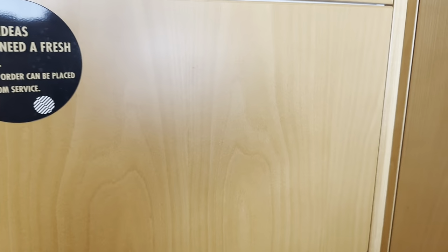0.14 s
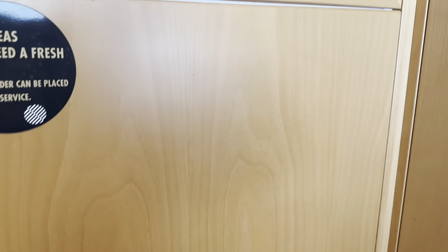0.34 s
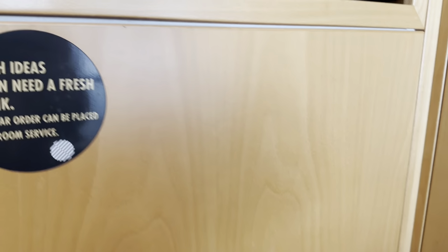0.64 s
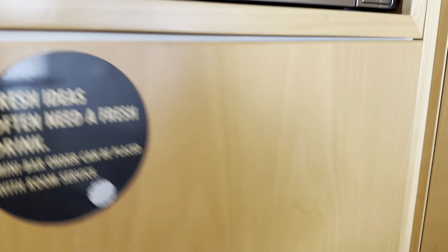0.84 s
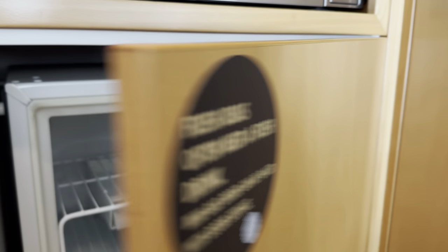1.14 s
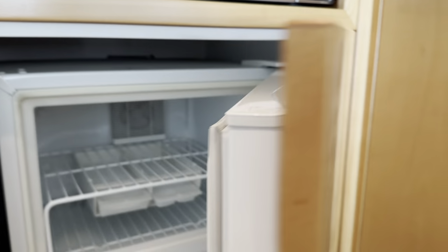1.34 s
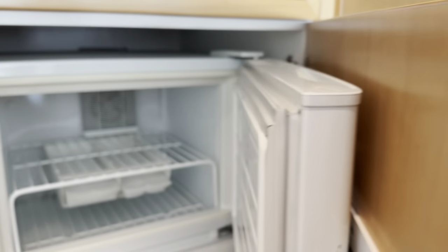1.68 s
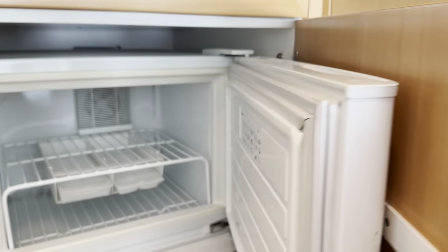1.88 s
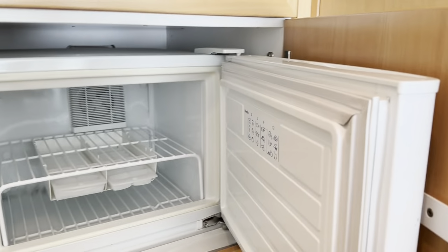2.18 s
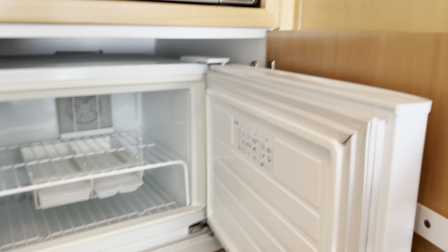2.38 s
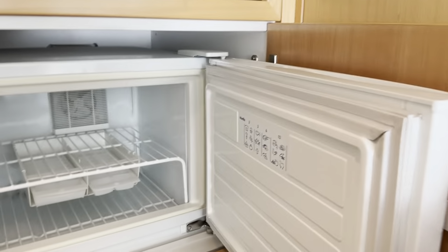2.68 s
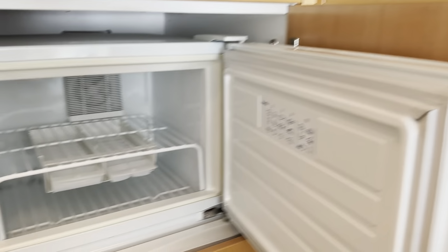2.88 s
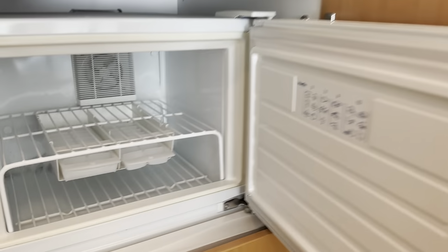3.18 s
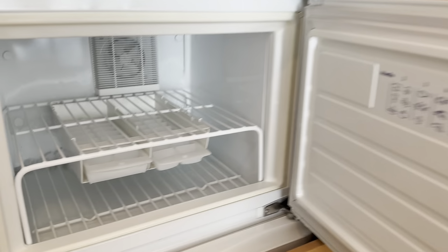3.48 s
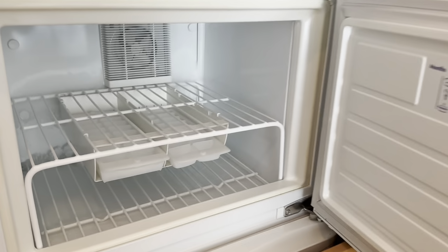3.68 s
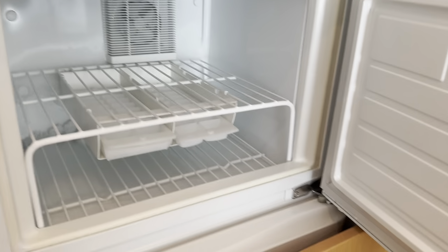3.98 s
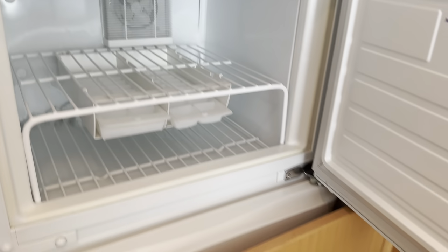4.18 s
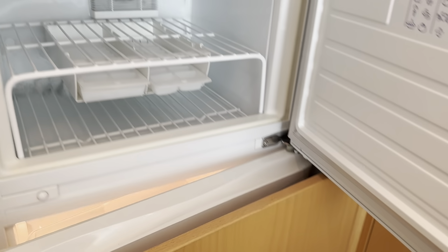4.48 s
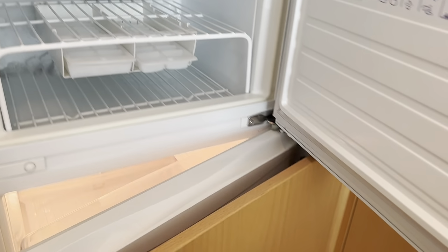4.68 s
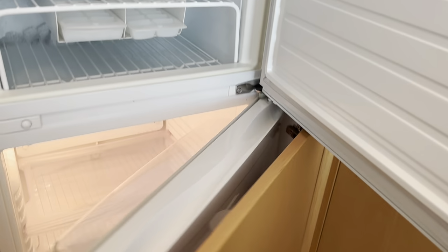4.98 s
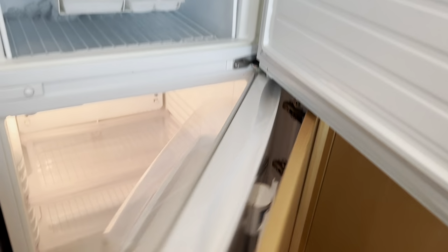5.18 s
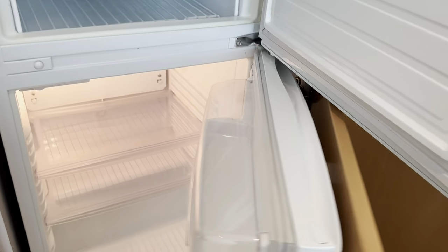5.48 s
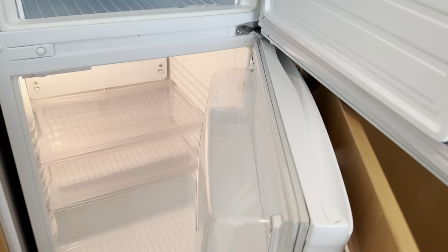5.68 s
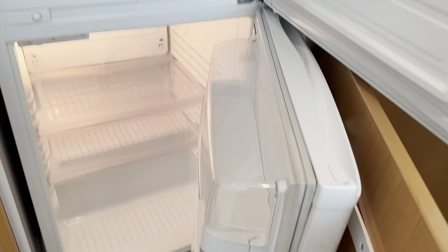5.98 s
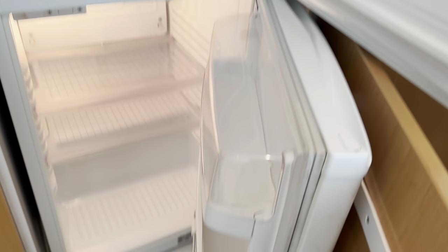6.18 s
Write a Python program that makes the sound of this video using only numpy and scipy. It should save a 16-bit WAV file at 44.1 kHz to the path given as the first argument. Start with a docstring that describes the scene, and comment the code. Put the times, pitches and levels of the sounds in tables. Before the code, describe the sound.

Loud, sharp wooden hinge cracks quicken and fade as a cabinet opens, then fridge doors knock, thump and peel their rubber seals over a low hum.

```python
"""Sharp cracks that quicken and weaken: a wooden cabinet door is pulled open on a stiff hinge, by stick-slip.
Each slip is a burst of noise that sets off decaying modes of hinge arm and panel, then a cavity boom.
Doors of the small fridge behind it knock (noise and modes), and a rubber seal crackles and peels in noise pops.
Pushed air rings the fridge low, rubbing is shaped noise, and a small quiet room adds a drone and hum tones.
Two close microphones hear it all."""
import sys
import numpy as np
from scipy import signal
from scipy.fft import rfft, irfft, next_fast_len
from scipy.io import wavfile
from scipy.ndimage import map_coordinates

SR = 44100
rng = np.random.default_rng(int(sys.argv[2]) if len(sys.argv) > 2 else 0)


def store_pcm(level_fs):
    """Save levels as 16-bit WAV."""
    pcm = np.round(np.clip(level_fs, -1, 1) * 32767).astype(np.int16)
    wavfile.write(sys.argv[1], SR, np.atleast_2d(pcm).T)


N = 279594
T = np.arange(int(.8 * SR)) / SR  # time within one struck sound, s
TOP_HZ = 15950  # upper band limit


def amp(db):
    """Logarithmic level: decibels to amplitude gain."""
    return 10 ** (np.asarray(db) / 20)


def unit(x):
    """Power normalisation: scale a (mid, side) pair so that mid has rms 1."""
    return x / np.sqrt(np.mean(x[0] ** 2) + 1e-20)


def struck(x):
    """Onset normalisation: scale a (mid, side) pair so that the first 30 ms of mid have rms 1."""
    onset = x[0, :int(.03 * SR)]
    return x / np.sqrt(np.mean(onset ** 2) + 1e-20)


def along(points, hz):
    """Logarithmic frequency scale: interpolate (f/Hz, value) points on a log axis."""
    f, v = np.transpose(points)
    return np.interp(np.log(hz + 1), np.log(f + 1), v)


def wobble(rate):
    """Band-limited fluctuation: a smooth random curve with rate knots a second."""
    knots = rng.standard_normal(int(N * rate / SR) + 4)
    return map_coordinates(knots, [np.arange(N) * rate / SR])


def filtered(x, response):
    """Linear filtering: multiply the spectrum of x by a complex response of frequency."""
    n = x.shape[-1]
    m = next_fast_len(n + 8192, True)
    return irfft(rfft(x, m) * response(np.fft.rfftfreq(m, 1 / SR)), m)[..., :n]


def coloured(x, spectrum):
    """Minimum phase: a causal filter derived from (f/Hz, level/dB) by folding its cepstrum."""
    def response(hz):
        cep = irfft(np.log(amp(along(spectrum, hz))))
        half = len(cep) // 2
        return np.exp(rfft(np.r_[cep[0], 2 * cep[1:half], np.zeros(half)]))
    return filtered(x, response)


def noise(spectrum, size):
    """Spectral shaping: a (mid, side) pair of independent coloured noises, mid at rms 1."""
    white = rng.standard_normal((2, size))
    return unit(filtered(white, lambda hz: amp(along(spectrum, hz))))


def dying(t60s):
    """Modal overlap: noise stands for countless modes, each frequency decaying at its own rate."""
    hz, t, z = signal.stft(rng.standard_normal((2, len(T))), SR, nperseg=256)
    decay = amp(-60 * t / along(t60s, hz)[:, None])
    return signal.istft(z * decay, SR, nperseg=256)[1][:, :len(T)]


def bent(x, lag):
    """Bending-wave dispersion: low frequencies arrive later (lag in s at 1 kHz)."""
    return filtered(x, lambda hz: np.exp(-4j * np.pi * lag * np.sqrt(1000 * hz)))


def ring(modes, attack, scatter_db):
    """Modal superposition: damped sines, with new strengths for each blow."""
    waves = 0
    for hz, db, t60 in modes:
        strength_db = db + rng.normal(0, scatter_db, (2, 1))
        phase = np.array([[0], [rng.uniform(0, 2 * np.pi)]])  # mid, side
        waves = waves + amp(strength_db - 60 * T / t60) * np.sin(2 * np.pi * hz * T + phase)
    return struck(waves * (1 - np.exp(-T / attack)))


def add(track, s, sound):
    """Linear superposition: mix a sound into the track at time s."""
    part = track[:, max(round(s * SR), 0):][:, :sound.shape[1]]
    part += sound[:, :part.shape[1]]


def boxed(x, span, echo_db, count=10):
    """Comb interference: close echoes between the walls colour a sound with fine peaks."""
    out = x.copy()
    gains = rng.choice([-1, 1], count) * amp(echo_db)
    for delay, gain in zip(rng.uniform(.002, span, count), gains):
        add(out, delay, gain * x)
    return out


# Room reverberation: columns f/Hz, decay time t60/s
ROOM_DECAY = [(100, 0.56), (500, 0.59), (2000, 0.442), (8000, 0.263), (15000, .22)]


def burst(spectrum, t60, tail_db):
    """Impact on a damped part: a brief noise, its close echoes and the room's reverberation."""
    blow = rng.standard_normal((2, len(T))) * amp(-60 * T / t60)
    direct = boxed(blow, span=.013, echo_db=-10.5)
    return struck(coloured(direct + amp(tail_db) * dying(ROOM_DECAY), spectrum))


def gesture(start, hold, attack, change_db, t60):
    """Envelope of one movement: rises until start, changes by change_db over the hold, then decays."""
    t = np.arange(N) / SR - start
    rise = np.exp(-(np.minimum(t, 0) / attack * 2) ** 2)
    return rise * amp(change_db * np.clip(t / hold, 0, 1) - 60 * np.maximum(t - hold, 0) / t60)


# Room drone spectrum: columns f/Hz, level/dB (relative)
DRONE_SPECTRUM = [(22, -18.5), (44, 4.5), (80, -5.5), (109, -2), (150, -12), (242, -18.5), (330, -25.5),
                  (600, -34), (1230, -45.5), (2400, -46.5), (3100, -56), (6100, -61.5), (11000, -59.5),
                  (16000, -67)]
# Hum tones: columns f/Hz, level/dB (peak, before wavering)
HUM_TONES = [(43, -58.5), (113, -54.5), (237, -61)]
# the low drone grows slowly from one level to a higher one
EARLY_DRONE_DB, LATE_DRONE_DB = -49.5, -45.5
DRONE_RISE_START_S, DRONE_RISE_END_S = 1.8, 3.6


def background():
    """Stationary noise and modulated tones: a low drone, which grows once, and a wavering hum."""
    t = np.arange(N) / SR
    drone_db = np.interp(t, [DRONE_RISE_START_S, DRONE_RISE_END_S], [EARLY_DRONE_DB, LATE_DRONE_DB])
    hum = np.zeros(N)
    for hz, db in HUM_TONES:
        strength = amp(db + 1.5 * wobble(7))
        hum += strength * np.sin(2 * np.pi * hz * t + 1.3 * wobble(14))
    drone = amp(drone_db) * noise(DRONE_SPECTRUM, N)
    return drone + hum * np.array([[1], [0]])  # hum in mid only


# Pulls and pushes that make a door rub: columns start t/s, hold t/s, scrape level/dB, hiss level/dB
RUB_STROKES = [(0, 0.3, -30.5, -47), (0.54, 0.16, -33.5, -50), (1.064, 0.17, -43, -77),
               (1.44, 1.68, -66.5, -75), (3.481, 0.064, -70.5, -68.5), (3.978, 0.7, -54, -71),
               (4.937, 0.22, -65.5, -74.5)]
# Free swings of a door: columns start t/s, hold t/s, level/dB
FREE_SWINGS = [(1.099, 0.37, -70), (2.378, 0.097, -80)]
# Spectra of scraping wood, rubbing fittings and the thin hiss of a swing: columns f/Hz, level/dB (relative)
SCRAPE_SPECTRUM = [(40, -27), (70, 7), (200, 0.5), (420, -3.5), (700, -8), (1500, -12.5), (3000, -23),
                   (7000, -52)]
HISS_SPECTRUM = [(1000, -12), (2500, 0), (5000, 0), (6700, -1), (8200, -7), (11000, -5), (14500, -17),
                 (17000, -35)]
SWING_SPECTRUM = [(4500, -27), (5900, -6), (6600, -1.5), (7300, -2.5), (8200, -17.5)]
# a stroke rises, eases off while it lasts, and dies away
STROKE_ATTACK_S, STROKE_SAG_DB, STROKE_T60_S = 0.069, 5, 0.74
SWING_ATTACK_S, SWING_T60_S = .2, 1.2
SCRAPE_ROUGH_DB, SCRAPE_CATCHES_PER_S = 2.5, 45


def rubbing():
    """Sliding friction: wood and fittings rub unevenly; a freely swinging door hisses thinly."""
    scrape, hiss, swish = np.zeros((3, N))
    for s, hold, scrape_db, hiss_db in RUB_STROKES:
        stroke = gesture(s, hold, STROKE_ATTACK_S, -STROKE_SAG_DB, STROKE_T60_S)
        scrape += amp(scrape_db) * stroke
        hiss += amp(hiss_db) * stroke
    for s, hold, db in FREE_SWINGS:
        swish += amp(db) * gesture(s, hold, SWING_ATTACK_S, 0, SWING_T60_S)
    scrape *= amp(SCRAPE_ROUGH_DB * wobble(SCRAPE_CATCHES_PER_S))
    hiss *= amp(1.2 * wobble(4.6))
    swish *= amp(1.3 * wobble(2.7))
    out = scrape * noise(SCRAPE_SPECTRUM, N)
    out += hiss * noise(HISS_SPECTRUM, N)
    return out + swish * noise(SWING_SPECTRUM, N)


# Air pushed by a fridge door: columns t/s, level/dB
AIR_PUSHES = [(2.6, -40), (3.787, -23), (4.019, -39.5), (4.411, -28.5)]
# Low modes of the fridge's box: columns f/Hz, level/dB (relative), t60/s
FRIDGE_BOX = [(68, 6.5, 0.23), (115.3, -0.5, 0.38), (234.7, -2, 0.3), (385.5, -15.5, 0.22)]
BASS_SCATTER_DB = 1  # also used by the cabinet boom


def thumps():
    """Resonance excited by pressure: the fridge's box rings low when a door pushes or pulls its air."""
    out = np.zeros((2, N))
    for s, db in AIR_PUSHES:
        add(out, s, amp(db) * ring(FRIDGE_BOX, attack=0.0095, scatter_db=BASS_SCATTER_DB))
    return out


# Door knocks: columns t/s, skin level/dB, hollow body level/dB, edge level/dB (before each part's trim); the
# first row adds a knock-like body to the last hinge slip, the others are fridge doors bumping
DOOR_KNOCKS = [(1.281, -34, -36.5, -63), (1.791, -44, -50.5, -60.5), (1.863, -45, -77, -62),
               (2.568, -38, -46, -61), (2.583, -40.5, -41, -45.5), (3.062, -59.5, -61, -80),
               (3.714, -51.5, -44.5, -76), (3.77, -11, -28.5, -35.5), (3.932, -39, -41, -69),
               (4.024, -32.5, -34, -35), (4.932, -50.5, -63, -64), (5.022, -56, -58, -69.5),
               (5.349, -43, -35.5, -40.5), (5.477, -37, -39.5, -57)]
# Spectra of the plastic skin, the door cavity and the hard edge: columns f/Hz, level/dB (relative)
SKIN_SPECTRUM = [(250, -23.5), (450, -7.5), (700, -10), (1000, -8), (1150, -3), (1380, -3.5), (1700, -13),
                 (1950, -10), (2500, -17), (3200, -29), (6000, -36.5), (9000, -59)]
HOLLOW_SPECTRUM = [(120, -18), (240, 2), (310, -2), (450, -3), (700, -9.5), (900, -11.5), (2000, -43.5)]
EDGE_SPECTRUM = [(1200, -12), (2100, -3.5), (3100, 0), (3900, 0.5), (4800, -7.5), (7000, -3.5),
                 (8100, -6.5), (9500, -21.5), (14000, -17)]
# Modes of the plastic skin and the hollow fridge door: columns f/Hz, level/dB (relative), t60/s
SKIN_RING = [(443, -14, 0.1), (765, -15.5, 0.17), (980.5, -2, 0.085), (1417, -11.5, 0.21),
             (1908, -8, 0.098)]
HOLLOW_RING = [(221.8, -12, 0.466), (278.5, 8, 0.22), (394, 3.5, 0.28), (552, -8.5, 0.35), (706, 3, 0.25)]


def knocks():
    """Impact excitation: doors bump with a hard edge, a plastic skin and the hollow behind it."""
    out = np.zeros((2, N))
    for s, skin_db, body_db, edge_db in DOOR_KNOCKS:
        add(out, s, amp(skin_db - 11.5) * burst(SKIN_SPECTRUM, t60=.06, tail_db=-18))
        add(out, s, amp(skin_db - 17.0) * ring(SKIN_RING, attack=0.00053, scatter_db=2.5))
        # the hollow answers just after the skin
        add(out, s + 0.0027, amp(body_db - 3.5) * burst(HOLLOW_SPECTRUM, t60=0.17, tail_db=-5.5))
        add(out, s + 0.00274, amp(body_db - 9.5) * ring(HOLLOW_RING, attack=0.016, scatter_db=6.5))
        add(out, s, amp(edge_db - 10.5) * burst(EDGE_SPECTRUM, t60=.06, tail_db=-4.5))
    return out


PEEL_START_S, PEEL_HOLD_S, PEEL_DB = 4.335, .062, -43.5  # the seal peels off
STRETCH_S, STRETCH_DB, STRETCH_SCATTER_DB = 0.22, -47.5, 0.5  # the stretch just before it peels


def stretching(count=6):
    """Stick-slip under tension: faint ticks at uneven gaps as the seal stretches, as (t/s, level/dB)."""
    slots = (np.arange(count) + rng.uniform(size=count)) / count
    return list(zip(PEEL_START_S - STRETCH_S * slots, rng.normal(STRETCH_DB, STRETCH_SCATTER_DB, count)))


# Sticky ticks of rubber and plastic: columns t/s, level/dB (before a common trim)
STICKY_TICKS = [(2.583, -40.5), (3.7609, -31), (3.776, -41.5), (3.926, -34), (3.978, -37.5), (4.021, -20),
                (4.031, -26), (4.1729, -39), (4.208, -38.5), (4.394, -27), (4.95, -52), (5.088, -51),
                (5.348, -29.5)]
# Spectra of rubber letting go and of air in the door gap: columns f/Hz, level/dB (relative)
RUBBER_SPECTRUM = [(300, -17), (800, -3.5), (1200, -8), (2500, -0.5), (3600, -9), (4400, -2.5), (5300, -6),
                   (8000, -4), (11200, -4.5), (13500, -12.5), (16000, -15)]
GAP_AIR_SPECTRUM = [(35, -37.5), (70, -3), (150, 2.5), (300, -2.5), (440, -4), (600, -7.5), (1000, -13),
                    (1600, -23), (4000, -41)]
PEEL_ATTACK_S, PEEL_SWELL_DB_PER_S, PEEL_T60_S = 0.012, 92, 0.083
GULP_DELAY_S, GULP_DB = 0.028, -29.5  # air rushes in once the peel has begun


def seal():
    """Adhesive release: rubber lets go in sticky ticks, then peels off in one rush of tiny pops."""
    out = np.zeros((2, N))
    for s, db in STICKY_TICKS + stretching():
        add(out, s, amp(db - 18.5) * burst(RUBBER_SPECTRUM, t60=0.028, tail_db=-13))
    swell_db = PEEL_SWELL_DB_PER_S * PEEL_HOLD_S
    peeling = amp(PEEL_DB) * gesture(PEEL_START_S, PEEL_HOLD_S, PEEL_ATTACK_S, swell_db, PEEL_T60_S)
    # pops of very unequal size, bunched where the rubber sticks
    pop_db = 5 * rng.standard_normal(N) + 2.5 * wobble(180)
    pops = rng.standard_normal((2, N)) * amp(pop_db)
    peel = peeling * unit(coloured(pops, RUBBER_SPECTRUM))
    # air is sucked through the widening gap
    peel += peeling * amp(-4) * noise(GAP_AIR_SPECTRUM, N)
    room = dying(ROOM_DECAY)
    echo = signal.fftconvolve(peel[:1], room / np.linalg.norm(room[0]), axes=1)[:, :N]
    out += peel + amp(-8) * echo
    # the last gulp, as the door comes free, sinks in pitch
    gulp = burst(GAP_AIR_SPECTRUM, t60=.15, tail_db=-17.0) * (1 - np.exp(-T / 0.027))
    add(out, PEEL_START_S + GULP_DELAY_S, amp(GULP_DB) * bent(struck(gulp), lag=0.012))
    return out


# Hinge slips: columns t/s, strength level/dB (relative to the first)
HINGE_SLIPS = [(0.051, 0), (0.4867, -4.5), (0.7212, -9.5), (0.8654, -15.5), (0.9807, -20), (1.0736, -28),
               (1.1477, -28), (1.2272, -29.5), (1.2814, -33.5)]
# Spectra of the hinge crack and the door panel: columns f/Hz, level/dB (relative)
CRACK_SPECTRUM = [(300, -9.5), (1200, -1.5), (2500, -1), (3600, 0), (5000, -10), (10000, -16.5),
                  (16000, -29.5)]
PANEL_SPECTRUM = [(30, -36), (60, -14), (105, 0), (148, -10), (195, -6), (280, -7), (560, -6), (830, -9),
                  (1000, -4), (1500, -3), (2200, -8), (3500, -19), (6000, -25), (10500, -34), (15000, -52),
                  (17000, -75)]
# Panel decay: columns f/Hz, t60/s
PANEL_DECAY = [(100, 0.62), (400, 0.55), (1200, 0.23), (3000, 0.32), (10000, 0.19)]
# Modes of the steel hinge arm, the panel and the cabinet cavity: columns f/Hz, level/dB (relative), t60/s
HINGE_ARM = [(2390, 2, 0.035), (3190, -0.5, 0.03), (3540, 6.5, 0.047), (4517, -8, 0.021),
             (5790, -11.5, 0.013)]
PANEL_MODES = [(234.6, 2, 0.17), (313, -4.5, 0.87), (394.3, -2, 0.76), (531, 0.5, 0.38), (641.4, 1, 0.3),
               (686, -7, .8), (940, -3.5, 0.2937), (1138, 0.5, .45), (1206, -8, 0.8), (1341, 3.5, 0.24),
               (1460, 1, 0.26), (1760, -13.5, 0.21), (1860, -12.5, .42)]
CAVITY_MODES = [(65.4, -1, .3), (78.1, -9.5, 0.3), (86.5, -4.5, 0.19), (121.15, -12, .35)]
CRACK_DB, PANEL_DB, BOOM_DB = 0.5, -15.5, -14  # the parts of a full-strength slip, before trims
CRACK_GROWS, BOOM_GROWS = 1.1, 0.829  # dB per dB of strength: weak slips lean towards boom


def hinge():
    """Stick-slip friction: a sharp steel crack, then the panel, treble first, and the cabinet boom."""
    out = np.zeros((2, N))
    panel = dying(PANEL_DECAY)
    for s, db in HINGE_SLIPS:
        crack_db = CRACK_DB + CRACK_GROWS * db
        panel_db = PANEL_DB + db
        boom_db = BOOM_DB + BOOM_GROWS * db
        snap = rng.standard_normal((2, len(T))) * amp(-60 * T / 0.0039) * [[1], [.4]]
        crack = coloured(snap, CRACK_SPECTRUM)
        # a gentler slip is duller
        crack = filtered(crack, lambda hz: amp(1.1 * min(crack_db, 0) * (hz / TOP_HZ) ** 2))
        add(out, s, amp(crack_db) * crack / np.abs(crack).max())
        add(out, s, amp(panel_db - 17) * ring(HINGE_ARM, attack=0.00033, scatter_db=7.0))
        # one shared panel sound, varied at random for each slip
        shaken = (panel + .5 * dying(PANEL_DECAY)) * (1 - np.exp(-T / 0.0013))
        body = coloured(boxed(shaken, span=.011, echo_db=-14.0), PANEL_SPECTRUM)
        add(out, s, amp(panel_db - 0.5) * bent(struck(body), lag=.003))
        modes = ring(PANEL_MODES, attack=0.0021, scatter_db=1.5)
        add(out, s, amp(panel_db - 7.5) * bent(modes, lag=0.0046))
        boom = ring(CAVITY_MODES, attack=0.005, scatter_db=BASS_SCATTER_DB)
        add(out, s + 0.022, amp(boom_db) * boom)
    return out


# Stereo width: columns f/Hz, side gain level/dB
SIDE_WIDTH = [(60, -19.5), (130, -16.5), (260, -11), (500, -4.5), (1500, -1.5), (4000, -3.5), (9000, -14)]
# Stereo balance: columns f/Hz, left minus right level/dB
LEFT_BALANCE = [(50, 0.5), (130, 2.5), (500, 2.5), (1000, 0.5), (4000, 0), (9000, 0.9)]
# Stereo phase: columns f/Hz, phase by which left leads/rad
LEFT_LEAD = [(100, 0), (1000, -0.1), (2300, 0.26), (3500, 1.4), (6000, 1.22), (8000, 2.1), (10000, 1.09),
             (14000, 0.5)]


def scene():
    """Interchannel differences: two close microphones, alike in the bass, left louder and mostly earlier."""
    mid, side = hinge() + knocks() + seal() + thumps() + rubbing() + background()
    side = filtered(side, lambda hz: amp(along(SIDE_WIDTH, hz)))
    sign = np.array([[.5], [-.5]])  # left, right

    def ports(hz):
        return amp(sign * along(LEFT_BALANCE, hz)) * np.exp(1j * sign * along(LEFT_LEAD, hz))
    return filtered(np.array([mid + side, mid - side]), ports)


def record(dry):
    """Saturation and band limiting: tall peaks are rounded, deep bass rolls off, the top is cut."""
    def band(hz):
        bass = signal.freqs(*signal.butter(5, 37, "high", analog=True), hz)[1]  # corner at 37 Hz
        return bass * (hz < TOP_HZ)
    limited = dry / (1 + np.abs(dry / .92) ** 8) ** (1 / 8)
    return filtered(limited, band)


dry = scene()
out = record(dry)
store_pcm(out)
```